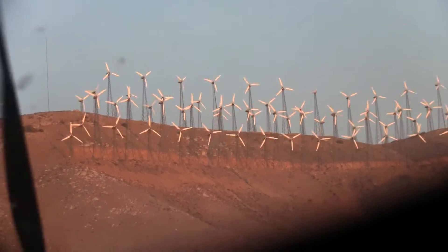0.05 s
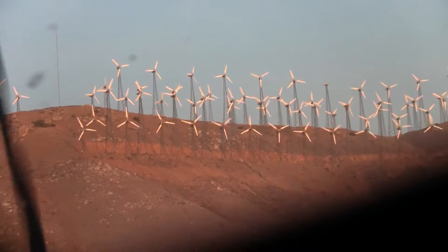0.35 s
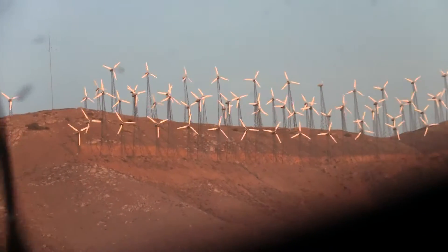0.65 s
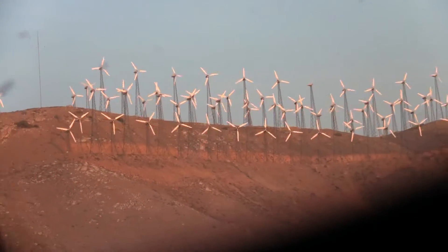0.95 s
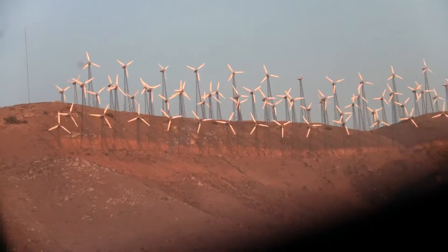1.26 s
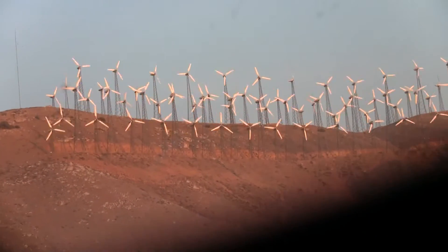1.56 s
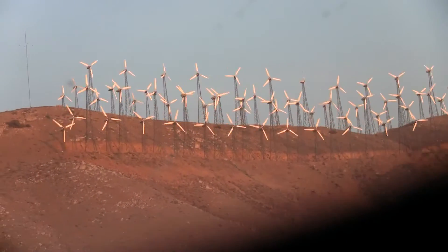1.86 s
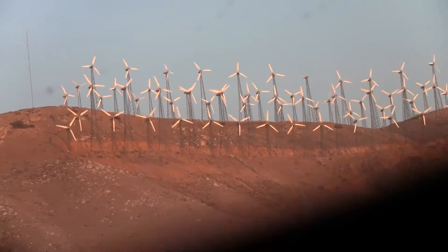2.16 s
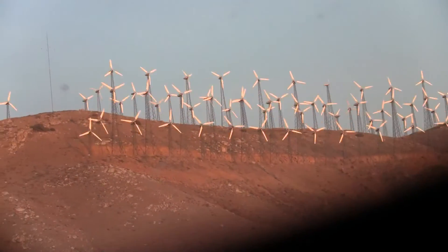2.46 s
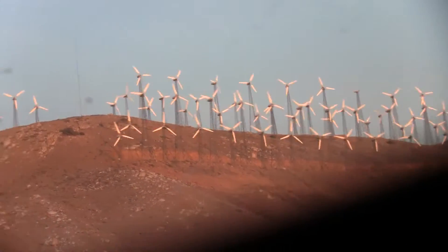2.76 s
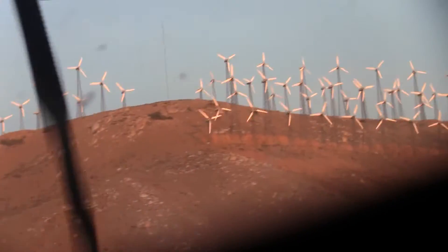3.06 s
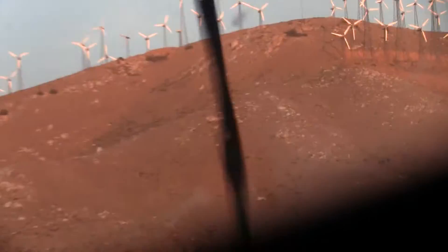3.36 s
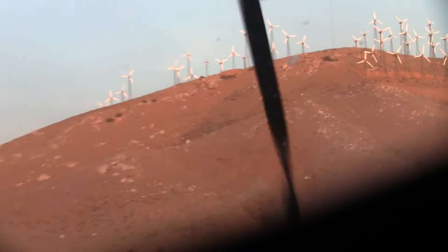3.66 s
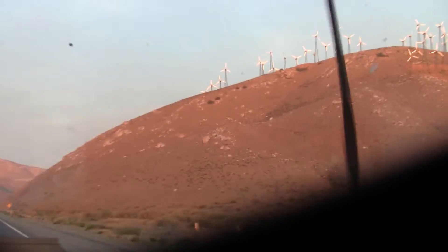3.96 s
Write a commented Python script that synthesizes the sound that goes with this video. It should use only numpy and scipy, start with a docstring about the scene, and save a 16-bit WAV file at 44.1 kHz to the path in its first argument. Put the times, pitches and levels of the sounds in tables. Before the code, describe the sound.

Steady road rumble and wind inside a moving vehicle, with loose fittings rattling.

```python
"""Inside the small cabin of a vehicle driving at a steady speed. Tyre rumble and wind roar form the
bed, under a wavering drive hum, a slowly building boom of cabin air and faintly singing body panels.
At the start the front and rear wheels thud over a seam, throwing a hard plastic part against its stop.
Loose fittings rattle all along, and now and then a panel gives a dull knock. Every hit is a burst of
coloured noise, smeared by the cabin's reflections."""
import sys
import numpy as np
from scipy import signal
from scipy.fft import rfft, irfft
from scipy.io import wavfile
from scipy.ndimage import uniform_filter1d

SR = 44100
rng = np.random.default_rng(int(sys.argv[2]) if len(sys.argv) > 2 else 0)


def int16_out(signal):
    """Quantize to a 16-bit WAV file."""
    q = np.round(np.clip(np.atleast_2d(signal).T, -1, 1) * 32767)
    wavfile.write(sys.argv[1], SR, q.astype(np.int16))


N = 176400
HIT_SAMPLES = 16384

# colour of the tyre and wind bed: frequency_hz, density_db
ROAD_COLOUR = [(20, -32), (31, -24), (40, -17.5), (51, -4), (64, -14), (85, -5), (110, -1.5), (126, -4),
               (170, -1), (208, -7), (255, -3.5), (320, -6.5), (400, -8), (500, -13.5), (600, -12),
               (800, -15), (1300, -23), (1700, -30.5), (2800, -41), (4000, -48.5), (6000, -58.5),
               (10500, -62), (13000, -69), (16000, -76)]
# fader rides on the bed: time_s, rumble_db, roar_db
ROAD_RIDES = [(0, -0.5, 1), (.6, -0.7, -0.6), (1.2, -0.2, 0.5), (1.8, 0, 0.1), (2.4, 0, 0.4),
              (2.9, 0.3, 1.5), (3.4, 0.3, 1.5), (4, 0.4, 2.5)]
# stereo width of the bed, thuds and knocks: frequency_hz, side_minus_mid_db
CABIN_WIDTH = [(25, -47), (85, -64), (180, -23), (350, -18), (700, -16), (1400, -14.5), (2800, -10),
               (5600, -6.5), (11000, 0)]
# sideways lean of the bed: frequency_hz, left_minus_right_db
ROAD_BALANCE = [(70, 0), (130, .4), (250, -.1), (600, -1), (1200, -.3), (2400, -.2), (5000, .4)]
# fader rides on the drive hum: time_s, fundamental_db, octave_db
HUM_RIDES = [(0, -48.5, -51.5), (.8, -43.5, -49), (1.3, -52.5, -46.5), (2.1, -45.5, -49), (2.7, -57, -45),
             (3.3, -48, -45), (4, -46.5, -52)]
# swell of the cabin air resonance: time_s, level_db
BOOM_SWELL = [(0, -64), (1.3, -68), (2.4, -52), (3.1, -50), (3.8, -41.5), (4, -45)]
# narrow body resonances: pitch_hz, bandwidth_hz, level_db
PANEL_MODES = [(580.7, 37, -57), (678, 49, -60), (1325, 43, -65)]
# wheel blows: start_s, level_db, hold_s, t60_s
THUD_CUES = [(0.103, -27, 0.016, .14), (0.194, -29.5, 0.04, 0.18)]
# deep colour of a wheel blow: frequency_hz, density_db
THUD_COLOUR = [(30, -30), (65, -7), (100, 0), (135, -2), (180, 0), (215, -6), (260, -4), (320, -12),
               (400, -13), (700, -23), (1500, -37), (4000, -62), (12000, -95)]
# hits of loose fittings: start_s, ring_db, ring_pitch_hz, click_db, fizz_db, t60_s
RATTLE_CUES = [(0.153, -59, 2200, -61, -68, .08), (.241, -58, 2520, -63, -69, .14),
               (0.254, -65, 2520, -68, -70, .15), (.335, -67, 2200, -65, -74, .2),
               (.372, -68, 2200, -75, -77, 0.15), (.438, -78, 2200, -67.5, -69, .13),
               (0.53, -60, 2400, -51, -55, 0.074), (0.6, -51, 1900, -62, -63.5, 0.091),
               (.645, -58, 2200, -74, -76, 0.27), (0.716, -48.5, 1870, -69, -84, 0.083),
               (0.745, -74, 3000, -65, -61, 0.078), (.815, -66, 2800, -61, -66, 0.11),
               (0.878, -55, 2400, -56, -59.5, 0.079), (.99, -51.5, 2000, -60, -66, 0.13),
               (1.063, -52, 1970, -64.5, -71, 0.25), (1.135, -51.5, 2290, -62.5, -67, 0.19),
               (1.152, -52, 2300, -63, -72, .16), (1.235, -55.5, 2200, -70, -77, .15),
               (1.262, -60, 2200, -63.5, -76, 0.083), (1.384, -51.5, 2170, -76, -88, 0.13),
               (1.602, -58, 2200, -75, -76, .2), (1.68, -56, 2200, -61.5, -66, 0.12),
               (1.771, -56.5, 2200, -73, -73, .17), (1.806, -60, 2200, -74, -72, 0.14),
               (1.861, -56, 2200, -66.5, -77, 0.1), (2.054, -63, 2200, -67, -74, 0.13),
               (2.142, -58, 2200, -66, -69, 0.15), (2.33, -57, 2200, -59.5, -65.5, 0.16),
               (2.404, -54, 2100, -73, -72.5, .22), (2.496, -63, 2200, -66, -70, 0.26),
               (2.528, -60, 1900, -59.5, -57.5, 0.086), (2.597, -71, 2200, -77, -72.5, 0.11),
               (2.665, -59, 2400, -64.5, -76, 0.24), (2.741, -59, 2200, -65, -70, .17),
               (2.785, -54, 2100, -68, -69, 0.12), (2.835, -51.5, 2110, -58, -61.5, .13),
               (2.945, -48, 2160, -53, -62.5, 0.13), (2.96, -44.5, 1900, -60.5, -78, 0.16),
               (3.04, -53.5, 2220, -66, -69, 0.091), (3.134, -45, 2190, -50.5, -60, 0.094),
               (3.176, -57, 2200, -63, -63, 0.11), (3.308, -65, 2200, -64, -70, 0.17),
               (3.361, -60, 2200, -66, -66, .14), (3.377, -110, 2200, -68, -74, 0.091),
               (3.496, -54.5, 2200, -69, -74, 0.14), (3.559, -52, 1990, -72, -79, 0.36),
               (3.614, -56, 2200, -71, -69, 0.13), (3.661, -50, 2100, -62, -69, 0.13),
               (3.739, -48, 2200, -57.5, -61.5, 0.1), (3.7539, -41.5, 2220, -58, -70, 0.076),
               (3.774, -54, 2140, -69, -75, 0.12), (3.861, -67, 2200, -80, -79, .1),
               (3.943, -56, 2240, -60, -69.5, 0.16)]
# a fitting's damped ring: pitch_multiple, density_db
RING_COLOUR = [(.15, -9), (.45, -5), (.75, -2.5), (.9, -4.5), (1, -4.5), (1.1, -6.5), (1.3, -15),
               (1.8, -20.5), (4, -60)]
# its contact click: frequency_hz, density_db
CLICK_COLOUR = [(1500, -36), (2800, 7), (3500, -0.5), (4250, 3), (5200, -1.5), (6600, -6), (8000, -8.5),
                (12000, -58)]
# the fizz above the click: frequency_hz, density_db
FIZZ_COLOUR = [(3500, -43), (6000, -3.5), (7500, -0.5), (9000, 0), (10700, -1), (12000, -7), (14000, -16),
               (16000, -17)]
# stereo width of rattles and clacks: frequency_hz, side_minus_mid_db
FITTING_WIDTH = [(500, -20), (2500, -10), (5000, -5), (8000, -3.5), (12000, 4)]
# strike and rebound of the plastic part: start_s, ring_db, crack_db, t60_s
CLACK_CUES = [(0.1652, -47, -44.5, 0.091), (0.1987, -48.5, -55.5, 0.091)]
# its damped resonances: frequency_hz, density_db
PLASTIC_COLOUR = [(900, -22), (1600, -7), (1900, -10), (2130, -1), (2350, -6), (2620, -1), (2960, 1),
                  (3250, -5.5), (3900, -19), (4300, -8), (4900, -20), (8000, -45)]
# its bright crack: frequency_hz, density_db
CRACK_COLOUR = [(1000, -12), (2800, 8), (3800, -4), (5500, -4.5), (7500, -7.5), (10800, -3), (12400, -8),
                (14000, -16), (16000, -21)]
# panel knocks: start_s, level_db
KNOCK_CUES = [(0.533, -42), (2.529, -32), (3.136, -38), (3.283, -40), (3.947, -41)]
# dull colour of a knock: frequency_hz, density_db
KNOCK_COLOUR = [(150, -33), (290, -6), (410, 2), (520, 0), (610, 2), (780, -5), (920, -15), (1150, -12),
                (1500, -21), (2500, -34), (6000, -52), (14000, -85)]


def amp(db):
    """Decibels to gain."""
    return 10 ** (np.asarray(db) / 20)


def unit(x):
    """Scales to an rms of one."""
    return x / np.sqrt(np.mean(x ** 2) + 1e-20)


def curve_at(points, hz):
    """Reads a curve on a log-frequency axis."""
    point_hz, value = np.transpose(points)
    return np.interp(np.log(hz + 1), np.log(point_hz + 1), value)


def add(mix, start_s, sound):
    """Drops a stereo sound into the mix on its cue."""
    part = mix[:, max(round(start_s * SR), 0):][:, :sound.shape[1]]
    part += sound[:, :part.shape[1]]


def drift(rate_hz, size=N):
    """Smooth random motion up to about a given rate, at unit rms."""
    hz = np.fft.rfftfreq(size, 1 / SR)
    lowpass = np.exp(-(hz / rate_hz) ** 2) * (hz > 0)
    return unit(irfft(rfft(rng.standard_normal(size)) * lowpass, size))


def noise(colour, width, size=HIT_SAMPLES):
    """Stereo noise of a given colour and width, at unit rms."""
    hz = np.fft.rfftfreq(size, 1 / SR)
    mid, side = rfft(rng.standard_normal((2, size))) * amp(curve_at(colour, hz))
    spread = amp(curve_at(width, hz))
    left_right = np.array([mid + spread * side, mid - spread * side]) / np.sqrt(1 + spread ** 2)
    return unit(irfft(left_right, size))


def ringing(pitch_hz, bandwidth_hz):
    """A resonance kept going by random shaking."""
    phase = 2 * np.pi * pitch_hz * np.arange(N) / SR
    return unit(drift(bandwidth_hz / 2) * np.cos(phase) + drift(bandwidth_hz / 2) * np.sin(phase))


def hit_envelope(rise_s, hold_s, t60_s):
    """Cabin reflections build up smoothly after a hit, hold and die away."""
    t = np.arange(HIT_SAMPLES) / SR
    swell = np.sin(np.pi / 2 * np.minimum(t / rise_s, 1)) ** 2
    return swell * amp(-60 * np.maximum(t - rise_s - hold_s, 0) / t60_s)


def uneven(x, depth_db=2.6, step_hz=220):
    """Random spectral peaks and dips give a fitting resonances of its own."""
    hz = np.fft.rfftfreq(HIT_SAMPLES, 1 / SR)
    knots_hz = np.arange(0, SR / 2, step_hz)
    ripple_db = np.interp(hz, knots_hz, depth_db * rng.standard_normal(len(knots_hz)))
    return unit(irfft(rfft(x) * amp(ripple_db)))


def tyres_and_wind(level_db=-36.5, crossover_hz=600, patch_db=2, flutter_db=0.85):
    """Tyres rumble below; wind roars above, with turbulent patches and a slight flutter."""
    frames = dict(fs=SR, nperseg=1024, noverlap=768)
    hz, t, bed = signal.stft(noise(ROAD_COLOUR, CABIN_WIDTH, N), **frames)
    patches = uniform_filter1d(rng.standard_normal(bed.shape[1:]), size=14, axis=0)  # blur in frequency
    patches = unit(uniform_filter1d(patches, size=10, axis=1))  # blur in time
    flutter = drift(rate_hz=17)[np.minimum((t * SR).astype(int), N - 1)]
    time_s, rumble_ride, roar_ride = np.transpose(ROAD_RIDES)
    rumble_db = np.interp(t, time_s, rumble_ride)
    roar_db = np.interp(t, time_s, roar_ride) + patch_db * patches - flutter_db * flutter
    roar_share = (hz ** 2 / (hz ** 2 + crossover_hz ** 2))[:, None]
    ride_db = (1 - roar_share) * rumble_db + roar_share * roar_db
    lean_db = np.array([.5, -.5])[:, None, None] * curve_at(ROAD_BALANCE, hz)[:, None]
    _, out = signal.istft(bed * amp(level_db + ride_db + lean_db), **frames)
    return out[:, :N]


def drive_hum(pitch_hz=136.5, pitch_wander=0.012, waver_db=1.5):
    """The drive's low tone wavers in pitch and level, with a blurred octave on top."""
    t = np.arange(N) / SR
    cycles = np.cumsum(pitch_hz * (1 + pitch_wander * drift(rate_hz=8.9))) / SR
    tone = unit(amp(waver_db * drift(rate_hz=6.5)) * np.sin(2 * np.pi * cycles))
    octave = ringing(2 * pitch_hz, bandwidth_hz=24)
    time_s, tone_db, octave_db = np.transpose(HUM_RIDES)
    return amp(np.interp(t, time_s, tone_db)) * tone + amp(np.interp(t, time_s, octave_db)) * octave


def cabin_boom():
    """The cabin air resonates, building towards the end."""
    swell_db = np.interp(np.arange(N) / SR, *np.transpose(BOOM_SWELL))
    return amp(swell_db) * ringing(pitch_hz=168, bandwidth_hz=23)


def singing_panels():
    """The road keeps the body panels ringing faintly."""
    return sum(amp(db) * ringing(pitch_hz, bandwidth_hz) for pitch_hz, bandwidth_hz, db in PANEL_MODES)


def wheel_thuds(rise_s=0.0077):
    """Front and rear wheels strike a seam and the body booms."""
    out = np.zeros((2, N))
    for start_s, level_db, hold_s, t60_s in THUD_CUES:
        thud = noise(THUD_COLOUR, CABIN_WIDTH) * hit_envelope(rise_s, hold_s, t60_s)
        add(out, start_s, amp(level_db) * thud)
    return out


def fitting_rattles(rise_s=.007, hold_s=.005, grain_db=1):
    """Loose fittings chatter: each hit is a grainy cluster of contacts with a damped ring."""
    out = np.zeros((2, N))
    for start_s, ring_db, ring_pitch_hz, click_db, fizz_db, t60_s in RATTLE_CUES:
        ring_colour = [(ring_pitch_hz * multiple, db) for multiple, db in RING_COLOUR]
        layers = [(ring_colour, ring_db), (CLICK_COLOUR, click_db), (FIZZ_COLOUR, fizz_db)]
        rattle = sum(amp(db) * uneven(noise(colour, FITTING_WIDTH)) for colour, db in layers)
        grain = unit(amp(grain_db * drift(rate_hz=500, size=HIT_SAMPLES)))
        add(out, start_s, rattle * grain * hit_envelope(rise_s, hold_s, t60_s))
    return out


def plastic_clacks(rise_s=.002, hold_s=.006):
    """Hard plastic strikes its stop and rebounds: a bright crack and a short, dry ring."""
    out = np.zeros((2, N))
    for start_s, ring_db, crack_db, t60_s in CLACK_CUES:
        ring = amp(ring_db) * noise(PLASTIC_COLOUR, FITTING_WIDTH)
        crack = amp(crack_db) * noise(CRACK_COLOUR, FITTING_WIDTH)
        add(out, start_s, (ring + crack) * hit_envelope(rise_s, hold_s, t60_s))
    return out


def panel_knocks():
    """A panel knocks, dull and quickly damped."""
    out = np.zeros((2, N))
    envelope = hit_envelope(rise_s=.003, hold_s=.016, t60_s=.05)
    for start_s, level_db in KNOCK_CUES:
        add(out, start_s, amp(level_db) * noise(KNOCK_COLOUR, CABIN_WIDTH) * envelope)
    return out


def scene():
    """The cabin mix: a steady driving bed with the hits on top."""
    bed = tyres_and_wind() + drive_hum() + cabin_boom() + singing_panels()
    return bed + wheel_thuds() + fitting_rattles() + plastic_clacks() + panel_knocks()


def record(dry):
    """A steep high cut at 15.7 kHz trims the top of the mix."""
    high_cut = signal.firwin(511, 15700, window=("kaiser", 9), fs=SR)
    return signal.oaconvolve(dry, high_cut[None], "same")


dry = scene()
out = record(dry)
int16_out(out)
```